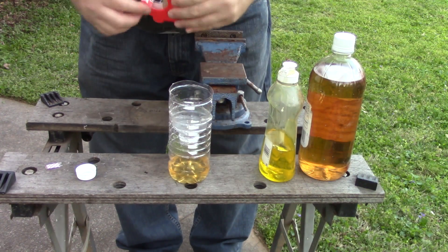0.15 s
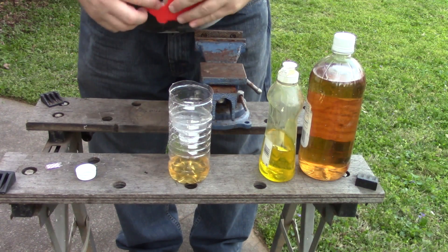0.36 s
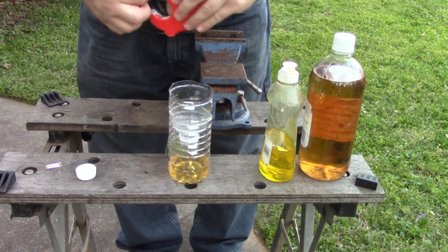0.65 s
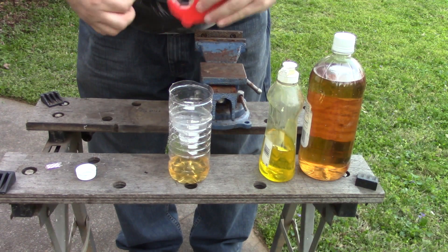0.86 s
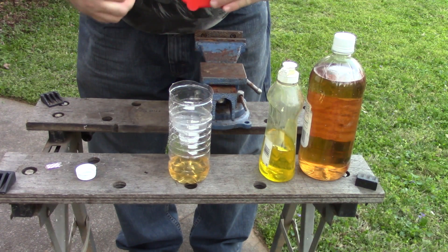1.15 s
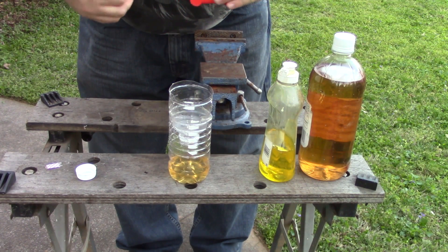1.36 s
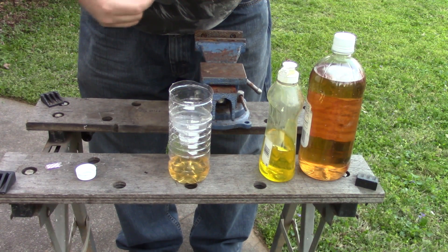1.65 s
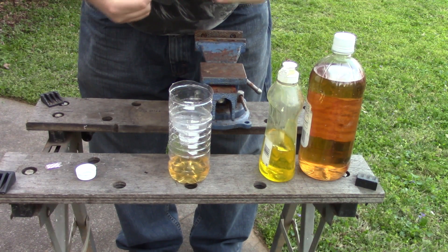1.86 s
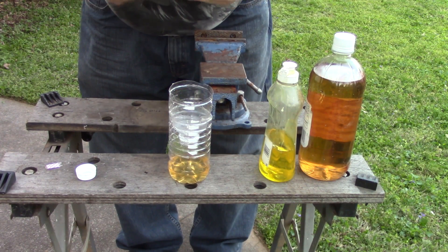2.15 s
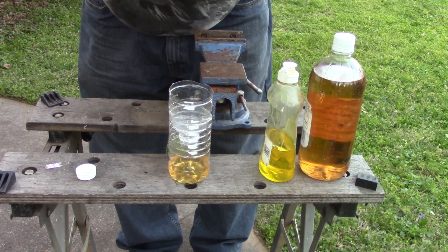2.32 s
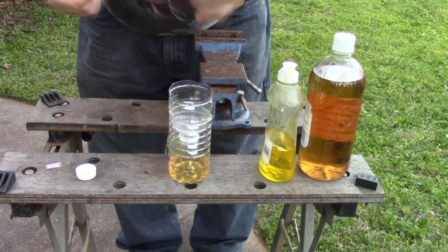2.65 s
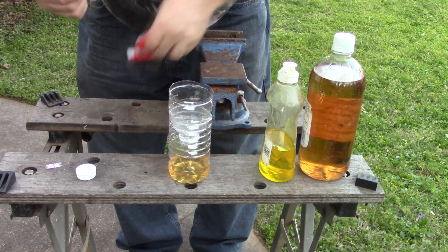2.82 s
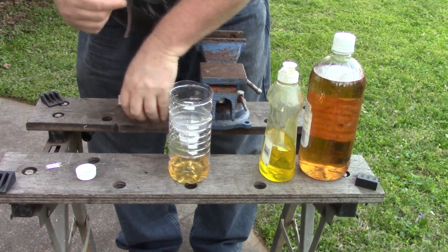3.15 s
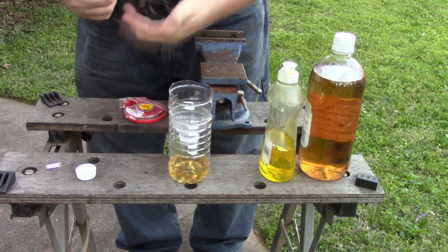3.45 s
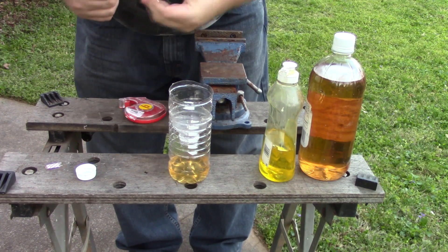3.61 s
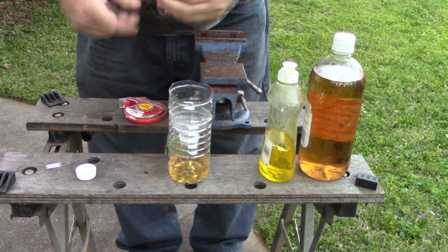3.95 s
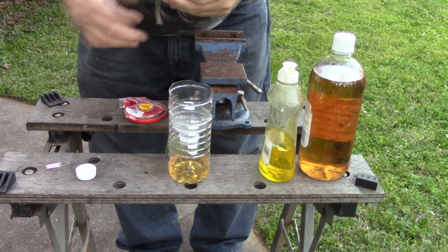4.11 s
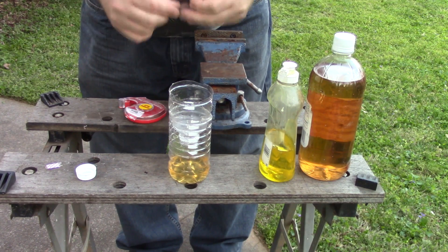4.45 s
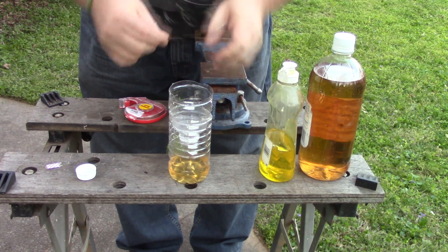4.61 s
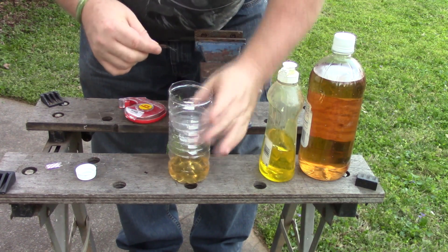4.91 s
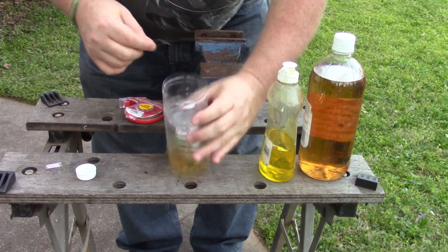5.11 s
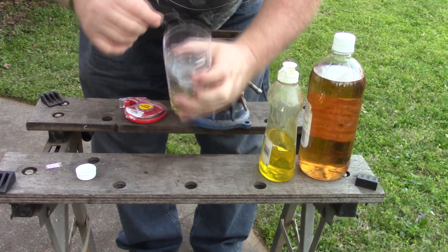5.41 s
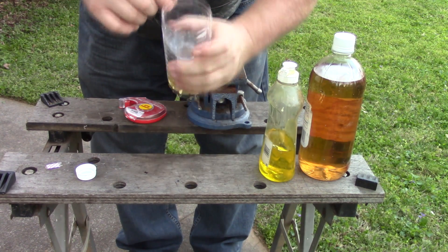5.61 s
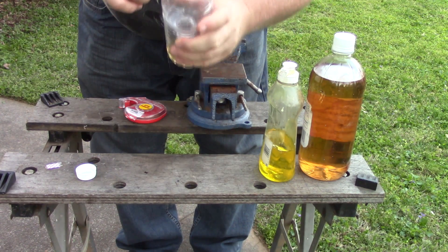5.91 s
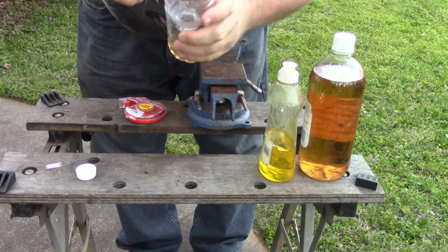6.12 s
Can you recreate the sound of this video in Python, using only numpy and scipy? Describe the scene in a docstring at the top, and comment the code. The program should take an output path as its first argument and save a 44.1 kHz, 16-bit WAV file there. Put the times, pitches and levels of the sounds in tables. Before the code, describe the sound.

Sticky tape rasps off a plastic dispenser, creaks, then tears with a sharp snap; the dispenser knocks on a bench over low engine drone and birdsong.

```python
"""Outdoors at a workbench, over a far engine's low harmonics, shaped noise for air, and birds as gliding tones.
Fingers tick; sticky tape jerks off a plastic hand dispenser by stick-slip, rasps with the speed of the pull
while the free strip's ring falls, and the reel creaks. The tape then tears on the blade, the dispenser
knocks on the bench and excites its modes, and the reel rattles after each. Soft bumps, ticks and grainy noise
follow as a hand takes a thin plastic bottle, and near the end two hollow tones overlap."""
import sys
import numpy as np
from scipy import signal
from scipy.fft import rfft, irfft
from scipy.io import wavfile
from scipy.ndimage import uniform_filter1d

SR = 44100
rng = np.random.default_rng(int(sys.argv[2]) if len(sys.argv) > 2 else 0)


def put_to_file(sound):
    """Save the sound as 16-bit audio at rate SR, in the file named by the first command-line argument."""
    columns = np.atleast_2d(sound).T  # one column per channel
    safe = np.clip(columns, -1, 1)
    whole_steps = np.round(safe * 32767)
    wavfile.write(sys.argv[1], SR, whole_steps.astype(np.int16))


N = 276507
TIME = np.arange(N) / SR


def undb(db):
    """Logarithmic level: decibels to amplitude gain."""
    return 10 ** (np.asarray(db) / 20)


def unit(x):
    """Normalisation to rms 1."""
    return x / np.sqrt(np.mean(x ** 2) + 1e-20)


def curves(table, t=TIME):
    """Linear interpolation in time of each column of a table."""
    s, *columns = np.transpose(table)
    return [np.interp(t, s, c) for c in columns]


def fade(t, t60):
    """Exponential decay, falling 60 dB in t60 seconds."""
    return np.exp(-np.log(1000) * t / max(t60, 1e-3))


def swell(s, half):
    """Gaussian rise and fall centred on time s."""
    return np.exp(-((TIME - s) / half) ** 2)


def envelope(s, attack, hold, t60):
    """Linear rise to full level at time s, a hold, then exponential decay."""
    return np.clip(1 + (TIME - s) / attack, 0, 1) * fade(np.maximum(TIME - s - hold, 0), t60)


def add(out, s, x):
    """Superposition: mix x into out at time s."""
    i = int(s * SR)
    x, i = x[max(-i, 0):], max(i, 0)
    out[i:i + len(x)] += x[:max(len(out) - i, 0)]


def colour(x, spectrum, tilt_db=0, size=2048):
    """Minimum-phase filter with the given spectrum, tilted about 3 kHz in dB per octave."""
    hz, db = np.transpose(spectrum)
    octave = np.log2(np.maximum(np.arange(size // 2 + 1) * SR / size, 1))
    tilt = tilt_db * np.clip(octave - np.log2(3000), -2, 2)
    gain = undb(np.interp(octave, np.log2(hz), db) + tilt)
    # folding the cepstrum makes the response causal
    cepstrum = irfft(np.log(gain))
    cepstrum[1:size // 2] *= 2
    cepstrum[size // 2 + 1:] = 0
    response = irfft(np.exp(rfft(cepstrum)))
    return signal.fftconvolve(x, response)[:len(x)]


def band(x, lo_hz, hi_hz):
    """Band-pass filtering."""
    edges = [lo_hz, min(hi_hz, SR / 2 - 1)]
    return signal.sosfilt(signal.butter(2, edges, "band", fs=SR, output="sos"), x)


def narrow_noise(hz, width_hz):
    """Narrow-band noise: random excitation of one resonance, rms 1."""
    return unit(band(rng.standard_normal(N), hz - width_hz / 2, hz + width_hz / 2))


def walk(rate):
    """Low-passed random process, rms 1, drawn afresh rate times a second."""
    k = int(SR / rate)
    steps = np.repeat(rng.standard_normal(N // k + 1), k)
    return unit(uniform_filter1d(uniform_filter1d(steps, k), k)[:N])


def blows(table, spectrum, gain_db, crack, tail_db, tail_t60, hold=0, modes=(), modes_db=0, dull_db=-7):
    """Impact excitation: a crack, a scrape of hold seconds, a dense short ring, a dull tail and body modes."""
    out, t = np.zeros(N), np.arange(SR // 4) / SR
    head = SR // 250  # the first 4 ms set the level
    ring = sum(undb(db) * np.sin(2 * np.pi * hz * t) * fade(t, t60) for hz, db, t60 in modes)
    for s, db, t60, *tilt in table:
        push = rng.standard_normal(len(t)) * fade(np.maximum(t - hold, 0), t60)
        push[0] = crack
        # the surroundings send back little of the top octave
        tail = colour(rng.standard_normal(len(t)) * fade(t, tail_t60), [(6000, 0.0011), (9000, dull_db)])
        hit = colour(push + undb(tail_db) * tail, spectrum, sum(tilt))
        hit /= np.std(hit[:head])
        if len(modes):
            hit += undb(modes_db) * ring / np.std(ring[:head])
        add(out, s, undb(db + gain_db) * hit)
    return out


# tape lets go of the roll in single jerks:
# (time [s], relative level [dB], ring t60 [s], brightness [dB per octave])
SLIPS = [(0.5604, -26, 0.028, -1.5), (.5995, -27, .01, 6), (0.6056, -23, 0.014, 2.5),
         (0.6113, -21.5, 0.0091, 4.5), (0.6154, -18, 0.012, -1), (0.6456, -17.5, 0.024, -2),
         (0.6654, -22, .016, 0), (0.6719, -21, .011, 0), (.674, -22, .015, 2), (.683, -22, 0.014, 0),
         (0.6887, -23, 0.013, 1.5), (.816, -34, 0.05, 0.5), (.831, -33.5, 0.04, -1)]
# spectrum of a jerk: (frequency [Hz], gain [dB])
SLIP_COLOUR = [(180, -67), (300, -41.5), (455, -19), (603, -27.5), (656, -17.5), (1140, -20.5), (1780, 1.5),
               (2000, -11), (2250, 3), (2740, -4.5), (6300, -3), (8090, -10), (10200, -2), (16000, -20.5)]


def jerks():
    """Stick-slip friction at its slowest: each single release is an impact."""
    return blows(SLIPS, SLIP_COLOUR, gain_db=-0.5, crack=7.6, tail_db=-21.5, tail_t60=0.11, dull_db=-3.5)


def roll_ring(slips, t60, count=4):
    """Impulse response: each slip lets go at one of a few places across the roll, each with its own ring."""
    t = np.arange(SR // 50) / SR
    place = rng.integers(count, size=N)
    out = np.zeros(N)
    for k in range(count):
        ring = unit(rng.standard_normal(len(t)) * fade(t, t60)) / np.sqrt(len(t))
        out += signal.fftconvolve(slips * (place == k), ring)[:N]
    return out


SLIP_RATE_HZ, PEEL_DB, PEEL_SPEED_DB = 770, -24.5, 6.5  # at 1 m/s; dB gained per tenfold speed
EASE_S, EASE_T60_S = 0.754, 0.35  # the hand eases off and the rasp dies away
STRIP_START_M, STRIP_WAVE_M_S = .015, 50  # free tape before the pull; speed of waves along it
STRIP_DB, STRIP_PEAK_S, STRIP_SWELL_S = -36.5, 0.728, .016  # the strip rings most while it is tautest
# speed of the pulling hand: (time [s], speed [m/s])
PULL = [(.668, .1), (.69, 0.18), (.71, .52), (.727, 0.96), (.765, .52), (.80, .3), (.812, .03)]
# spectrum of the rasp: (frequency [Hz], gain [dB])
PEEL_COLOUR = [(120, -56), (220, -29), (400, -10), (1000, -4.5), (1600, -0.5), (2300, -1), (3000, 4),
               (3700, -2.5), (6200, 1), (8300, -6.5), (12600, -5), (16000, -22.5)]


def peel(jitter=.35, scatter_db=1.0, patchy_db=2.0, fizz_db=-23, roll_t60=0.02, flutter=.085, rate_power=.6):
    """Stick-slip quickens with pull speed; the free strip, a half-wave resonator, falls in pitch as it grows."""
    pulling = (TIME > PULL[0][0]) & (TIME < PULL[-1][0])
    speed = np.maximum(curves(PULL)[0], 1e-3)
    rate = SLIP_RATE_HZ * speed ** rate_power
    cycles = np.cumsum(rate * np.exp(jitter * walk(300))) / SR
    slips = np.diff(np.floor(cycles), prepend=0) * undb(scatter_db * rng.standard_normal(N))
    # after each slip, threads of glue snap in a fizz
    threads = undb(fizz_db) * rng.standard_normal(N) * np.exp(-(cycles % 1) / 0.54)
    rasp = roll_ring(slips * np.sqrt(500 / rate), roll_t60) + threads
    rasp *= undb(patchy_db * walk(260))  # the glue grips in patches
    effort = undb(PEEL_DB + PEEL_SPEED_DB * np.log10(speed))
    effort *= fade(np.maximum(TIME - EASE_S, 0), EASE_T60_S)

    strip_m = STRIP_START_M + np.cumsum(speed * pulling) / SR
    strip_hz = STRIP_WAVE_M_S / (2 * strip_m) * np.exp(flutter * walk(400))
    strip = np.sqrt(2) * np.sin(2 * np.pi * np.cumsum(strip_hz) / SR) * undb(2 * walk(250))
    taut = undb(STRIP_DB) / (1 + ((TIME - STRIP_PEAK_S) / STRIP_SWELL_S) ** 2)
    return pulling * (unit(colour(rasp, PEEL_COLOUR)) * effort + strip * taut)


CREAK_T60_S = 0.023
# the dispenser's reel creaks round: (time [s], relative level [dB])
CREAKS = [(1.1642, -34.5), (1.1883, -34), (1.208, -32.5), (1.2222, -34.5), (1.25, -36.5)]
# spectrum of a creak: (frequency [Hz], gain [dB])
CREAK_COLOUR = [(130, -27), (210, -18), (270, 6.5), (400, -15.5), (700, -13), (850, 1), (1050, -23),
                (1600, -9), (3050, -4), (3700, -9), (4500, -7.5), (7000, -13.5), (12400, -9), (16000, -25)]


def creaks():
    """Friction bursts: each creak is a crack and a 4 ms scrape that then rings down."""
    events = [(s, db, CREAK_T60_S) for s, db in CREAKS]
    return blows(events, CREAK_COLOUR, gain_db=1.5, crack=2.2, tail_db=-5.5, tail_t60=0.11, hold=0.004)


# tape parts tooth by tooth on the blade: (time [s], relative level [dB], ring t60 [s])
TEAR = [(2.3825, -33, .02), (2.3845, -20, .016), (2.3865, -13, .018), (2.3895, -17, .02), (2.392, -24, .02)]
# spectrum of the tear: (frequency [Hz], gain [dB])
TEAR_COLOUR = [(120, -41.5), (200, -19), (450, -23.5), (690, -10.5), (950, -18), (1550, 0), (1950, -12),
               (3500, -10.5), (4100, -13), (5500, -4.5), (8700, -13.5), (10300, -13.5), (16000, -28)]
# modes of the dispenser's shell: (frequency [Hz], relative level [dB], t60 [s])
SHELL = [(1634, 3, 0.052), (1440, -11, 0.058), (2180, 0, 0.075), (5130, -13.5, .06), (5356, -6.5, .06),
         (5634, -7.5, 0.077), (6026, -11, 0.047)]


def tear():
    """Fracture in steps: each parting is an impact that excites the shell's modes."""
    return blows(TEAR, TEAR_COLOUR, gain_db=-1, crack=2.2, tail_db=-26.0, tail_t60=0.17,
                 modes=SHELL, modes_db=-12.0)


# the dispenser lands on the bench and rocks:
# (time [s], relative level [dB], ring t60 [s], brightness [dB per octave])
KNOCKS = [(3.1924, -28.5, 0.0096, 1.5), (3.2171, -12, 0.032, 1.5), (3.2603, -31, 0.013, 2),
          (3.2662, -33, 0.014, 15)]
# spectrum of a knock: (frequency [Hz], gain [dB])
KNOCK_COLOUR = [(120, -42), (220, -22.5), (400, -10.5), (690, -11.5), (950, -11), (1650, -2), (2400, -10),
                (3400, -4), (4400, -14.5), (5900, -13), (8000, -27.5), (11500, -28.5), (16000, -57)]
# modes of the shell on the bench: (frequency [Hz], relative level [dB], t60 [s])
BENCH = [(397, -11, 0.29), (485, -11, 0.092), (972, -4.5, 0.053), (1190, -4.5, 0.032), (1640, 6, 0.039),
         (2070, -1.5, .05), (3106, -2.5, 0.036), (3460, -1.5, 0.0414), (3716, -19.5, 0.04),
         (5730, -5.5, .05)]


def knocks():
    """Modal impact: each contact rings the shell and bench together."""
    return blows(KNOCKS, KNOCK_COLOUR, gain_db=1.0, crack=6.3, tail_db=-19.5, tail_t60=0.13,
                 modes=BENCH, modes_db=-12)


TICK_T60_S = .024
FIDGET_SPAN_S, FIDGET_DB, FIDGET_SCATTER_DB = (0.92, 5.1), -48.5, 6  # faint ticks at random; relative level
# fingers and tape tick on plastic: (time [s], relative level [dB], brightness [dB per octave])
TICKS = [(.39, -29, 4), (.927, -42, -3), (.963, -33, 0), (1.485, -42, 5.5), (1.816, -15.5, 2.5),
         (1.857, -26.5, 0), (2.218, -21.5, 1), (2.55, -40, 1.5), (3.043, -26.5, -5), (3.081, -32.5, -5.5),
         (4.394, -41.5, 1), (4.743, -44, 0.5), (4.965, -41, -.5), (5.252, -43, 0.5), (5.547, -47, 11),
         (5.6, -43.5, -1.5), (6.11, -38, -.5)]
# spectrum of a tick: (frequency [Hz], gain [dB])
TICK_COLOUR = [(180, -41), (300, -7), (1460, 1.5), (2610, -6.5), (3080, 1), (4020, -6), (5610, -2),
               (7820, -10.5), (8500, -10.5), (11300, -11.5), (16000, -29.5)]


def ticks(faint_count=9):
    """Light impacts: clear ticks with faint random ones between them."""
    faint = []
    for _ in range(faint_count):
        s = rng.uniform(*FIDGET_SPAN_S)
        db = FIDGET_DB + FIDGET_SCATTER_DB * rng.uniform(-1, 1)
        faint.append((s, db, 2))
    touches = [(s, db, TICK_T60_S, tilt_db) for s, db, tilt_db in list(TICKS) + faint]
    return blows(touches, TICK_COLOUR, gain_db=-10, crack=4.3, tail_db=-18.5, tail_t60=0.15)


# short grainy rubs, some of them the noisy tails of ticks, jerks and creaks:
# (centre time [s], half length [s], level [dB])
RUBS = [(.393, .011, -42.5), (0.596, 0.013, -37.5), (0.832, 0.05, -49), (0.967, 0.012, -50.5),
        (1.041, 0.017, -56), (1.254, 0.016, -48.5), (3.875, 0.024, -58), (3.923, 0.019, -50.5),
        (4.523, 0.019, -45), (4.952, 0.034, -54.5), (5.679, 0.016, -56.5)]
# spectrum of rubbing and rattling: (frequency [Hz], gain [dB])
RUB_COLOUR = [(200, -9.5), (500, 0.5), (1200, 0), (2500, -0.5), (5800, 0.5), (8000, -8.5), (11500, -3.5),
              (16000, -23)]


def grainy_noise(grain_db, rate):
    """Random modulation: noise whose level flickers, rms 1 after colouring."""
    grains = rng.standard_normal(N) * undb(grain_db * walk(rate))
    return unit(colour(grains, RUB_COLOUR))


def rubs():
    """Amplitude shaping: grainy noise swells briefly for each rub or noisy tail."""
    level = sum(undb(db) * swell(s, half) for s, half, db in RUBS)
    return level * grainy_noise(4.5, 500)


# the hand nudges the bench and takes the bottle: (time [s], relative level [dB], ring t60 [s])
BUMPS = [(3.044, -45, 0.12), (3.082, -47, 0.067), (4.525, -47, 0.083), (4.925, -49, .051),
         (4.965, -47.5, 0.14), (5.010, -47, 0.032), (5.601, -50, 0.064), (6.109, -59, .05)]
# spectrum of a bump: (frequency [Hz], gain [dB])
BUMP_COLOUR = [(120, -20.5), (250, -12.5), (420, 5), (700, -5.5), (1700, -13), (3000, -25), (10000, -36)]


def bumps():
    """Soft impacts: a weak crack and a mostly low ring."""
    return blows(BUMPS, BUMP_COLOUR, gain_db=-0.5, crack=0.9, tail_db=-24.5, tail_t60=.15)


RATTLE_LAG_S, RATTLE_HALF_S, RATTLE_DB = 0.025, 0.011, -31.5  # dB relative to the blow's table level


def rattle():
    """Loose contact: the reel rattles after the hardest blow of the tear and of the landing."""
    hardest = [max(table, key=lambda row: row[1]) for table in (TEAR, KNOCKS)]
    shaking = sum(undb(db + RATTLE_DB) * swell(s + RATTLE_LAG_S, RATTLE_HALF_S) for s, db, *_ in hardest)
    return shaking * grainy_noise(2.0, 700)


ENGINE_HZ, ENGINE_WANDER = 25.32, .003  # firing rate; its slow wander as a share
# the drone, 4th order: (time [s], level [dB])
DRONE = [(0.0, -42), (0.5, -43.5), (1.16, -36), (2.45, -43.5), (2.86, -55), (3.5, -38.5), (4.14, -36.5),
         (4.78, -46), (5.84, -39), (6.2, -38.5)]
# the 5th order: (time [s], level [dB])
OVERTONE = [(0, -50.5), (.35, -56), (1.1, -42.5), (2.0, -61.5), (2.4, -51.5), (3.2, -44.5), (4.0, -62.5),
            (6.27, -63.5)]
# the 8th order, an octave above the drone: (time [s], level [dB])
OCTAVE = [(0, -60), (1.0, -57.5), (2.0, -52.5), (3.5, -52), (4.3, -63), (6.27, -55.5)]
# steady weaker orders, before waver: (order [1], level [dB])
ENGINE_ORDERS = [(2, -64), (3, -61.5), (6, -57.5), (7, -63), (9, -65.5), (11, -72.5), (12, -71.5),
                 (20, -71.5), (24, -69)]


def engine(waver_db=-0.7, weak_waver_db=3.5):
    """Harmonic series: only low firing harmonics carry this far, and each swells and fades on the way."""
    phase = 2 * np.pi * np.cumsum(ENGINE_HZ * (1 + ENGINE_WANDER * walk(3))) / SR
    strong = [(4, DRONE), (5, OVERTONE), (8, OCTAVE)]
    orders = [(k, curves(table)[0] + waver_db * walk(27)) for k, table in strong]
    orders += [(round(k), db + weak_waver_db * walk(5)) for k, db in ENGINE_ORDERS]
    out = np.zeros(N)
    for k, db in orders:
        out += np.sqrt(2) * undb(db) * np.sin(k * phase + rng.uniform(0, 2 * np.pi))
    return out


SONG_BRIGHTEST_S, SONG_TURN_S = 3.6, 1.6  # the whistles brighten towards this time, then dull again
SONG_DULL_DB, SONG_BRIGHT_DB = -7.5, 5.5  # dB per octave
# one bird whistle: (time from its start [s], frequency [Hz], relative level [dB])
WHISTLE = [(0, 4750, -18.5), (.015, 4370, -18), (.04, 3780, -9), (.09, 3010, -8), (.102, 2500, -6.5),
           (.125, 2020, -6), (.16, 1740, -10), (.19, 1640, -22)]
# whistles: (time [s], relative level [dB], length factor [1])
SONG = [(-.118, -60, 1.1), (1.306, -78.5, 0.98), (2.136, -63, 1.06), (2.62, -61, 0.97), (2.904, -57, .91),
        (3.435, -56, 0.99), (3.705, -53, 1.02), (3.99, -53, 1.07), (4.33, -54.5, 1.05), (4.675, -55.5, .96),
        (5.021, -55, 0.98), (5.385, -63.5, 1.16), (5.83, -64, 1)]


def birdsong(echo_db=-3, echo_t60=0.49, flicker_db=3.0):
    """Frequency glide and scattering: a falling whistle, returned diffusely by trees and houses."""
    song = np.zeros(N)
    for s, db, length in SONG:
        hz, shape_db = curves(WHISTLE, np.arange(0, WHISTLE[-1][0], 1 / SR / length))
        brightening = np.exp(-((s - SONG_BRIGHTEST_S) / SONG_TURN_S) ** 2)
        tilt_db = SONG_DULL_DB + (SONG_BRIGHT_DB - SONG_DULL_DB) * brightening
        gain = undb(db + shape_db + tilt_db * np.log2(hz / hz.mean()))
        add(song, s, gain * np.sin(2 * np.pi * np.cumsum(hz) / SR))
    song *= undb(flicker_db * walk(120))
    t = np.arange(SR) / SR
    scatter = unit(rng.standard_normal(SR) * fade(t, echo_t60)) / np.sqrt(SR)
    return song + undb(echo_db) * signal.fftconvolve(song, scatter)[:N]


CHORUS_ATTACK_S, CHORUS_T60_S = 0.039, 0.74
# phrases of far birds: (time [s], length [s], level near 2.5 kHz [dB], level near 4.2 kHz [dB])
CHORUS = [(.8, 0.23, -67, -66.5), (1.6, 0.35, -72.5, -71), (3.45, 1.45, -73.5, -80.5),
          (5.85, 0.43, -71.5, -83)]


def chorus():
    """Diffuse sound: far birds blur into two noise bands."""
    low, high = narrow_noise(2440, 330), narrow_noise(4130, 330)
    out = np.zeros(N)
    for s, length, low_db, high_db in CHORUS:
        blur = undb(low_db) * low + undb(high_db) * high
        out += envelope(s, CHORUS_ATTACK_S, length, CHORUS_T60_S) * blur
    return out


HOLLOW_ATTACK_S = .008
# two hollow tones that overlap: (time [s], frequency [Hz], tone level before flutter [dB], t60 [s])
HOLLOW = [(6.169, 512, -43, 0.21), (6.19, 850, -51, 2.7)]


def hollow_tones(noise_db=-6, flutter_db=3, wander=.025):
    """Random modulation: decaying tones, unsteady in pitch and level, roughened by shared band noise."""
    out, rough = np.zeros(N), narrow_noise(660, 500)
    for s, hz, db, t60 in HOLLOW:
        phase = 2 * np.pi * np.cumsum(hz * (1 + wander * walk(60))) / SR
        tone = np.sqrt(2) * np.sin(phase) * undb(flutter_db * walk(90))
        out += undb(db) * envelope(s, HOLLOW_ATTACK_S, 0, t60) * (tone + undb(noise_db) * rough)
    return out


AIR_DB = -57.5  # level between 300 Hz and 15 kHz, before the sway
# spectrum of the outdoor air: (frequency [Hz], gain [dB])
AIR = [(15, -45), (25, -14.5), (48, -15), (76, -11), (108, -0.5), (127, -7), (153, -15.5), (206, -15),
       (263, -20), (451, -21), (607, -22), (754, -23.5), (1440, -33.5), (13200, -51), (16000, -52)]


def air(sway_db=-1.76):
    """Broadband noise: soft outdoor rumble and hiss that sway slowly in level."""
    noise = colour(rng.standard_normal(N), AIR, size=8192)
    noise /= np.std(band(noise, 300, 15000))
    return noise * undb(AIR_DB + sway_db * walk(2.8))


def scene():
    """Superposition: close handling over the far garden sounds."""
    tape = jerks() + creaks() + tear() + peel()
    handling = ticks() + rubs() + bumps() + knocks() + rattle()
    garden = engine() + birdsong() + chorus() + hollow_tones() + air()
    return (tape + handling + garden)[None]


TOP_HZ = 16000


def record(dry):
    """Soft saturation rounds the highest peaks; a steep low-pass cuts the top."""
    return signal.sosfilt(signal.ellip(8, .2, 70, TOP_HZ, fs=SR, output="sos"), np.tanh(dry))


dry = scene()
out = record(dry)
put_to_file(out)
```